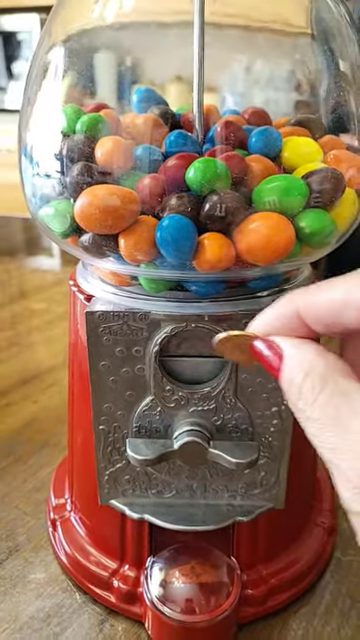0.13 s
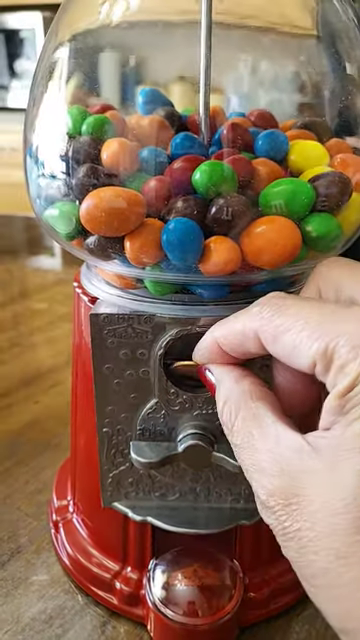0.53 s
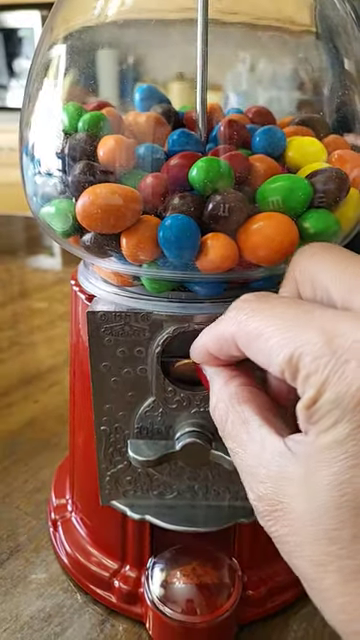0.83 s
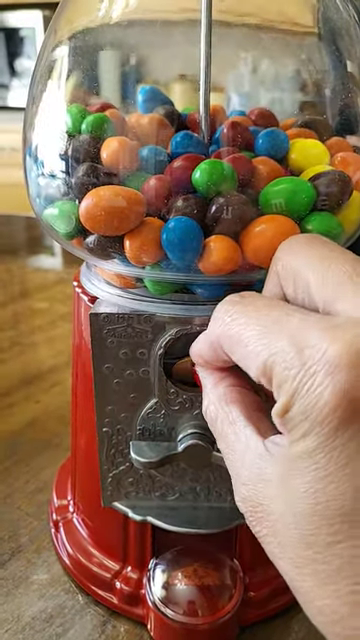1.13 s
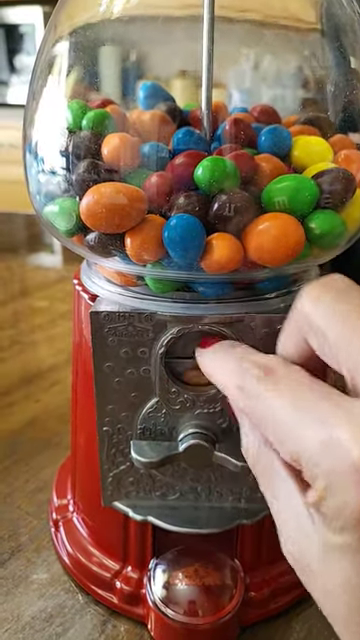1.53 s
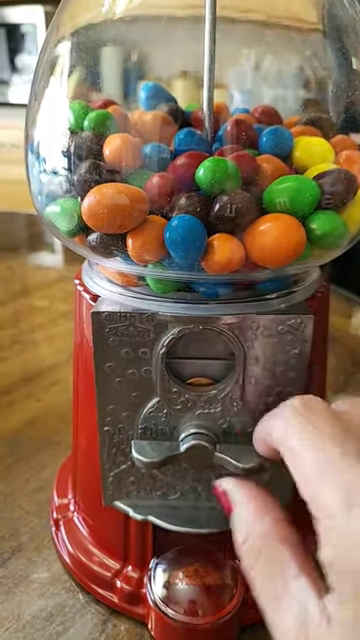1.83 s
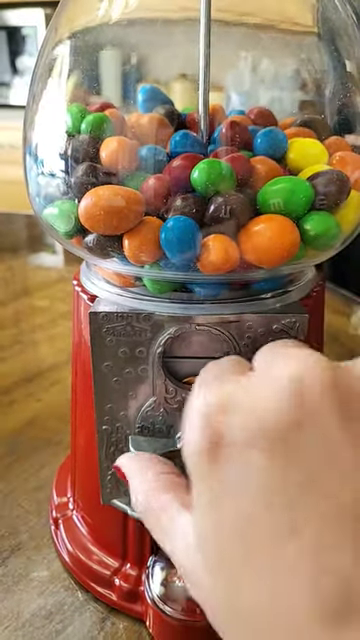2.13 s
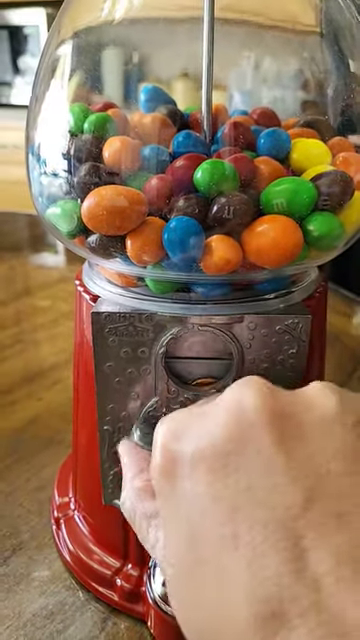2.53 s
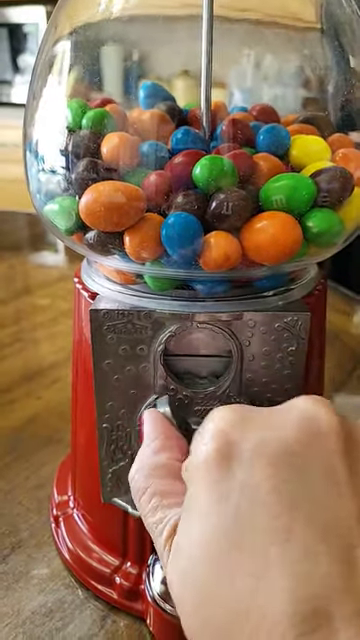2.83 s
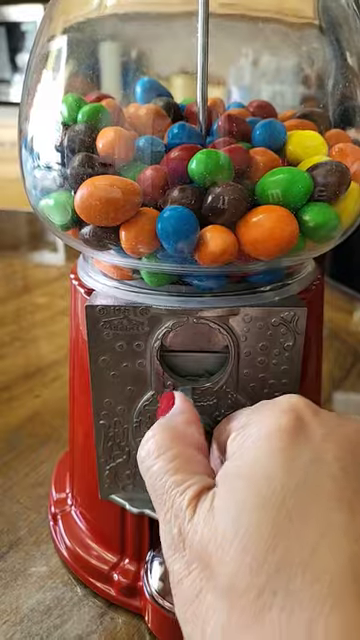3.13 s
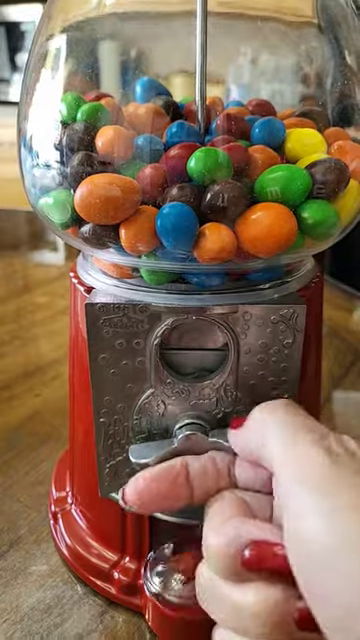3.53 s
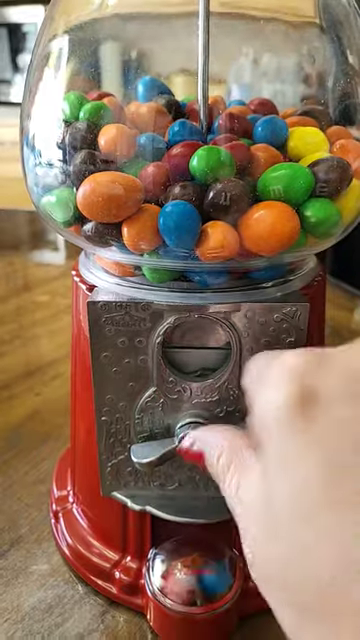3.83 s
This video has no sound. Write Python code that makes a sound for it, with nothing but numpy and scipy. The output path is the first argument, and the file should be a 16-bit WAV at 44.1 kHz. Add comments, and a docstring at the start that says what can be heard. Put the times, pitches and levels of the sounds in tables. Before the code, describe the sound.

A small metal candy dispenser heard close up in a quiet room: a coin ticks at the slot and drops behind the plate, the crank knocks and clanks, then hard candies clatter down the chute.

```python
"""A faint hum, low air noise, brushing fingers and a soft knock come first: a small metal candy dispenser, close by.
A coin ticks and slides at the slot, then drops and bounces behind the face plate: noise bursts plus damped modes.
The crank is turned: friction noise rubs and judders, the works clank, and the hollow housing thumps in low modes.
Hard candies clatter down the chute: dense bursts over chute modes, with the steel flap ringing high above them."""
import sys
import numpy as np
from scipy import signal
from scipy.fft import rfft, irfft, next_fast_len
from scipy.io import wavfile

SR = 44100
rng = np.random.default_rng(int(sys.argv[2]) if len(sys.argv) > 2 else 0)


def file_out(sig):
    """Save sig as 16-bit WAV at sys.argv[1]."""
    # one column per channel
    cols = np.atleast_2d(sig).T
    # limit, then scale
    lim = np.clip(cols, -1, 1)
    pcm = np.round(lim * 32767).astype(np.int16)
    wavfile.write(sys.argv[1], SR, pcm)


N = 176400  # samples in the scene
RING_N = 24000  # samples in one contact
TOP_HZ = 15700  # band limit
# spacing and depth of the random peaks: broad ones drawn for each contact, dense ones drawn for each body
PATCH_HZ, PATCH_DB = 330, 3.2
MODE_HZ, MODE_DB = 35, 3
GRAZE_S = .004  # parts graze for this long before they strike

# normal modes of the coin: (frequency [Hz], relative level [dB])
COIN_MODES = [(2490, 8), (3450, 3.5), (4160, 6)]


def amp(db):
    """Level to amplitude ratio: 20 dB is a factor of ten."""
    return 10 ** (np.asarray(db) / 20)


def unit(x):
    """Normalisation to unit mean power."""
    return x / np.sqrt(np.mean(x ** 2) + 1e-20)


def along(points, hz):
    """Linear interpolation of (frequency [Hz], value) points on a logarithmic frequency axis."""
    f, v = np.transpose(points)
    return np.interp(np.log(hz + 1), np.log(f + 1), v)


def fade(t, t60):
    """Exponential decay: the amplitude falls by 60 dB in t60 seconds."""
    return np.exp(-np.log(1000) * t / max(t60, 1e-3))


def add(out, s, x):
    """Superposition: mix x into out from time s [s]."""
    part = out[:, max(round(s * SR), 0):][:, :x.shape[1]]
    part += x[:, :part.shape[1]]


def coloured(x, tone, shades=()):
    """Minimum-phase filtering: two unrelated signals become a stereo pair of given colour and coherence."""
    # left-right likeness: (frequency [Hz], correlation [-1 to 1])
    likeness = [(40, 0.21), (280, 0.99), (600, 0.24), (2500, -0.058), (12000, -0.1)]
    size = 2 * next_fast_len(x.shape[1] // 2 + 2048)
    hz = np.fft.rfftfreq(size, 1 / SR)
    low_cut = np.sqrt(1 + (tone[0][0] / 2 / (hz + 1)) ** 4)
    gain = unit(amp(along(tone, hz)) / low_cut)
    # shades act after the colour has been brought to unit power
    gain = gain * amp(sum(along(shade, hz) for shade in shades))
    # folding the cepstrum onto positive times makes the filter causal
    cepstrum = irfft(np.log(gain + 1e-6))
    cepstrum[1:size // 2] *= 2
    cepstrum[size // 2 + 1:] = 0
    response = np.exp(rfft(cepstrum))
    alike = np.clip(along(likeness, hz), -1, 1)
    shares = np.sqrt([(1 + alike) / 2, (1 - alike) / 2])
    mid, side = irfft(rfft(x, size) * response * shares)[:, :x.shape[1]]
    return np.array([mid + side, mid - side])


def ripple(spacing_hz, depth_db):
    """Modal irregularity: random peaks and valleys, weak in the bass, of unit power; (Hz, dB) points."""
    hz = np.arange(0, SR / 2, spacing_hz)
    db = depth_db * np.clip(rng.standard_normal(len(hz)), -2, 2) * hz / (hz + 2 * PATCH_HZ)
    return np.c_[hz, 20 * np.log10(unit(amp(db)))]


def hardness(treble_db, clunk_db=0):
    """Contact stiffness: how one blow departs from the usual colour; (Hz, dB) points."""
    return [(540, 0), (760, clunk_db), (1500, 0), (6500, 0), (11000, treble_db)]


def ring(modes, t60, attack_s, channels=2, scatter_db=1.0):
    """Modal vibration: damped sines start after the graze, with level and phase varied at each blow."""
    t = np.maximum(np.arange(RING_N) / SR - GRAZE_S, 0)
    out = 0
    for hz, db in modes:
        gain = amp(db + scatter_db * rng.standard_normal((channels, 1)))
        phase = rng.uniform(0, 2 * np.pi, (channels, 1))
        out = out + gain * np.sin(2 * np.pi * hz * t + phase)
    return out * fade(t, t60) * (1 - np.exp(-t / attack_s))


def clack(tone, body, shade, hold_s, t60, tail_db, tail_t60, attack_s):
    """Impact: a brief graze, a dense noise burst, then a weak tail of housing and room whose treble dies first."""
    graze_db = -21  # against the blow
    damp_hz, treble_life = 8500, .75  # above damp_hz the tail has this share of its decay time
    t = np.arange(RING_N) / SR - GRAZE_S
    after = np.maximum(t, 0)
    rise = 1 - np.exp(-after / attack_s)
    graze = amp(graze_db) * np.maximum(1 - np.abs(t) / GRAZE_S, 0)
    near, far = rng.standard_normal((2, 2, RING_N))
    burst = near * (graze + rise * fade(np.maximum(after - hold_s, 0), t60))
    dull = signal.filtfilt(*signal.butter(2, damp_hz, fs=SR), far)
    bright = far - dull
    tail = dull * fade(after, tail_t60) + bright * fade(after, tail_t60 * treble_life)
    patch = ripple(PATCH_HZ, PATCH_DB)
    return coloured(burst + amp(tail_db) * rise * tail, tone, [body, shade, patch])


def thump():
    """Structural resonance: the hollow housing answers a blow in its low modes."""
    # normal modes of the housing: (frequency [Hz], relative level [dB])
    housing_modes = [(65, -10.5), (194, -2), (222, -1), (250, -3), (290, 5.5), (325, 1)]
    return amp(-6.5) * ring(housing_modes, t60=.15, attack_s=0.00061, channels=1, scatter_db=6.0)


def strokes(rows, tone, rise, grain_db, grain_rate):
    """Sliding friction: each noise stroke swells, dies away and catches unevenly, grain_rate times a second."""
    out = np.zeros((2, N))
    for s, length, db in rows:
        size = int(length * SR)
        u = np.arange(size) / size
        grain = np.interp(np.arange(size) * grain_rate / SR, np.arange(N), rng.standard_normal(N))
        hiss = rng.standard_normal((2, size)) * unit(amp(grain_db * grain))
        # rise is the share of the stroke spent swelling
        shape = np.interp(u, [0, np.clip(rise, .01, .9), 1], [0, 1, 0])
        padded = np.pad(hiss * shape, ((0, 0), (0, 2048)))  # room for the filter to ring on
        add(out, s, amp(db) * coloured(padded, tone))
    return out


def sing(rows, q):
    """Driven resonance: friction noise passes one resonance of sharpness q, swells and dies away."""
    out, f = np.zeros((2, N)), np.arange(20, TOP_HZ, 10)
    for s, length, db, hz in rows:
        peak = np.c_[f, -20 * np.log10(1 + (q * (f / hz - hz / f)) ** 2)]
        out += strokes([(s, length, db)], peak, rise=0.11, grain_db=0, grain_rate=0)
    return out


def room():
    """Stationary background: low air noise of fixed spectrum and an appliance's hum of steady sines."""
    # hum partials: (frequency [Hz], level [dB])
    hum_partials = [(60, -68), (308, -66), (438, -64.5)]
    # air noise spectrum: (frequency [Hz], relative level per hertz [dB])
    air_tone = [(25, -29), (55, -14), (300, -13), (450, -14), (800, -27.5), (1500, -36.5), (4000, -42),
                (6300, -33.5), (15000, -46)]
    t = np.arange(N) / SR
    hum = sum(amp(db) * np.sin(2 * np.pi * (hz * t + rng.random())) for hz, db in hum_partials)
    return hum + amp(-65.5) * coloured(rng.standard_normal((2, N)), air_tone)


def coin_in_slot():
    """Impact and friction of a held coin: it ticks and slides at the slot, its modes ringing faintly after each
    tick."""
    # coin touching the slot: (time [s], relative level [dB], treble [dB])
    ticks = [(0.694, -31.5, -7), (0.829, -46.5, -35), (0.926, -43.5, -1), (1.016, -61, 15),
             (1.388, -51.5, -2.5), (1.43, -39, 3), (1.612, -36.5, 15)]
    # coin sliding on the slot's edge: (start [s], length [s], level [dB])
    slides = [(.72, 0.138, -56), (1.365, 0.084, -52)]
    # coin ringing faintly as its rim drags: (start [s], length [s], level [dB], resonance [Hz])
    rim_rings = [(.53, 0.15, -64, 1960), (1.035, 0.14, -71.5, 2410), (1.44, 0.23, -71.5, 2560)]
    # fingers brushing the plate: (start [s], length [s], level [dB])
    brushes = [(0, 0.12, -63.5), (.53, 0.14, -68.5), (.586, 0.13, -47.5)]
    # spectra of coin and fingers: (frequency [Hz], relative level per hertz [dB])
    coin_tone = [(700, -31.5), (2000, -16.5), (3400, -8.5), (5100, -5), (6000, -16), (7500, -11.5),
                 (9000, -29.5), (15500, -42)]
    brush_tone = [(240, -11), (400, -6), (480, -8.5), (4670, -9.5), (15000, -23.5)]
    out = strokes(slides, coin_tone, rise=0.86, grain_db=1.0, grain_rate=900)
    out += strokes(brushes, brush_tone, rise=0.094, grain_db=2.5, grain_rate=1600)
    out += sing(rim_rings, q=6)
    body = ripple(MODE_HZ, MODE_DB)
    for s, db, treble_db in ticks:
        burst = clack(coin_tone, body, hardness(treble_db), hold_s=0.0008, t60=0.024,
                      tail_db=-27.5, tail_t60=0.67, attack_s=0.00047)
        held_ring = ring(COIN_MODES, t60=0.23, attack_s=.0005)
        add(out, s - GRAZE_S, amp(db) * (amp(7.5) * burst + amp(-29) * held_ring))
    return out


def coin_drop():
    """Repeated impact: let go, the coin bounces to rest behind the face plate and excites the housing."""
    # coin dropping and bouncing in its pocket: (time [s], relative level [dB], treble [dB])
    bounces = [(1.637, -17.5, 1), (1.676, -28.5, -8), (1.699, -22, 3.5), (1.73, -26, 0.5), (1.749, -27, -8),
               (1.759, -34, 1), (1.765, -33, -12), (1.895, -38.5, -60)]
    # spectrum of the bounces: (frequency [Hz], relative level per hertz [dB])
    drop_tone = [(260, -30), (530, -13.5), (700, 3.5), (1100, -9), (2200, -2.5), (3300, -2), (6280, 2.5),
                 (15500, -10)]
    out, body = np.zeros((2, N)), ripple(MODE_HZ, MODE_DB)
    for s, db, treble_db in bounces:
        burst = clack(drop_tone, body, hardness(treble_db), hold_s=0.0017, t60=0.021,
                      tail_db=-17, tail_t60=0.34, attack_s=0.00079)
        free_ring = ring(COIN_MODES, t60=0.13, attack_s=0.00057)
        add(out, s - GRAZE_S, amp(db) * (amp(2.5) * burst + amp(-28) * free_ring + amp(-20) * thump()))
    return out


def crank():
    """Friction and impact in a mechanism: the wheel rubs and judders; pawl and gears knock on the cast housing."""
    # knocks of crank, pawl and wheel, the first (0.086 s) a soft tap of finger or coin on the plate: (time [s],
    # level [dB], treble [dB], clunk [dB], relative level of the housing's thump [dB])
    knocks = [(0.086, -51.5, -10, 10, -62), (2.208, -44.5, -43, 3, -63), (2.525, -58.5, -20, 20, -81.5),
              (2.57, -47, -25, 12, -59.5), (2.615, -48, -37, 18, -50.5), (2.69, -23.5, -6, 1, -39),
              (2.694, -16.5, 4.5, -7.5, -37.5), (2.799, -30.5, 12.5, 6.5, -45), (3.027, -43.5, 3, 2, -35),
              (3.056, -41, -3, 16.5, -64), (3.334, -13, 4.5, -11, -23), (3.346, -16, 12, -7.5, -40),
              (3.361, -20, 16, -15, -56), (3.419, -31, 20, 3, -41.5), (3.431, -18, 14.5, -7.5, -41),
              (3.499, -18.5, 11, -3, -28), (3.525, -10, 10.5, -24.5, -35), (3.545, -23, 17, 21, -28),
              (3.553, -11, 14, -27, -33), (3.58, -24, 1, -6, -55), (3.61, -24.5, 2, -31, -34.5)]
    # wheel rubbing as it turns: (start [s], length [s], level [dB])
    rubs = [(1.89, 0.22, -62), (2.59, 0.29, -59), (2.93, 0.3, -59), (3.532, 0.089, -19)]
    # housing juddering under the crank's load: (start [s], length [s], level [dB], resonance [Hz])
    judders = [(2.78, 0.016, -39.5, 274), (2.96, 0.14, -54.5, 239), (3.054, 0.07, -34.5, 290),
               (3.335, 0.025, -21, 231), (3.37, 0.17, -40, 212.5), (3.542, 0.031, -25, 263),
               (3.63, 0.43, -39, 254)]
    # dull shoves against the table: (start [s], length [s], level [dB])
    shoves = [(3.335, 0.15, -51), (3.5, 0.18, -34), (3.745, 0.045, -40)]
    # spectra of works and shoves: (frequency [Hz], relative level per hertz [dB])
    works_tone = [(450, -9.5), (760, 1), (1250, -1), (1800, -1), (2080, 8), (2450, -0.5), (4000, 0.5),
                  (7000, 0.5), (8500, -10.5), (15500, -23)]
    shove_tone = [(25, -12.5), (55, -2), (130, -12.5), (800, -49)]
    # normal modes of the works: (frequency [Hz], relative level [dB])
    works_modes = [(690, 0.67), (2016, 2), (2060, 0.67), (2198, 0.93), (2805, 3.5)]
    out = strokes(rubs, works_tone, rise=0.065, grain_db=3.0, grain_rate=260)
    out += sing(judders, q=3.5)
    out += strokes(shoves, shove_tone, rise=0.18, grain_db=6, grain_rate=61)
    body = ripple(MODE_HZ, MODE_DB)
    for s, db, treble_db, clunk_db, thump_db in knocks:
        burst = clack(works_tone, body, hardness(treble_db, clunk_db), hold_s=0.0032, t60=0.017,
                      tail_db=-13.0, tail_t60=0.35, attack_s=0.00045)
        metal = amp(-20) * ring(works_modes, t60=0.09, attack_s=0.00063)
        add(out, s - GRAZE_S, amp(db) * (burst + metal) + amp(thump_db) * thump())
    return out


def candies():
    """Impact excitation: sugar shells clatter down the chute; the hardest hits ring the steel flap's high modes."""
    # candies striking chute and flap: (time [s], relative level [dB], treble [dB])
    strikes = [(3.628, -6, -11.5), (3.648, -10, 1), (3.673, -10.5, -2), (3.703, -16, -15),
               (3.711, -9.5, -4), (3.727, -8, -9), (3.74, -21.5, 3), (3.751, -11.5, 2), (3.772, -11, 0),
               (3.799, -16, -2), (3.813, -15, -9.5), (3.844, -20.5, -3.5), (3.869, -17.5, -14),
               (3.895, -22.5, -5), (3.906, -24.5, -11), (3.912, -17.5, -13), (3.93, -23.5, -3),
               (3.943, -19.5, -12), (3.954, -25.5, -9), (3.97, -22.5, -26), (3.98, -27, -9)]
    # spectrum of the strikes: (frequency [Hz], relative level per hertz [dB])
    candy_tone = [(240, -21), (400, -20.5), (834, -17.5), (1050, -11.5), (1820, -15.5), (2090, -5.5),
                  (4840, -5), (13100, -6), (15500, -15)]
    # normal modes of chute and flap: (frequency [Hz], relative level [dB])
    chute_modes = [(1077, -12), (2018, -4.5), (2518, -2), (3845, -5.5), (4452, -16), (4878, -0.5)]
    flap_modes = [(9380, -15), (12910, -3.5), (13260, -3)]
    # the flap's ring, a row each for the left and right microphone: (relative level [dB])
    flap_db = np.array([[-4], [-11]])
    out, body = np.zeros((2, N)), ripple(MODE_HZ, MODE_DB)
    for s, db, treble_db in strikes:
        burst = clack(candy_tone, body, hardness(treble_db), hold_s=0.0026, t60=0.027,
                      tail_db=-10.5, tail_t60=.33, attack_s=0.00023)
        chute = amp(-11.5) * ring(chute_modes, t60=0.062, attack_s=0.0002)
        flap = amp(treble_db + flap_db) * ring(flap_modes, t60=.04, attack_s=0.00068)
        add(out, s - GRAZE_S, amp(db) * (amp(-1.5) * burst + chute + flap))
    return out


def scene():
    """Superposition of coin, crank and candies over the quiet room."""
    return room() + coin_in_slot() + coin_drop() + crank() + candies()


def record(dry):
    """Transduction: two microphones differ in colour, round off the highest peaks and are band-limited."""
    # left over right: (frequency [Hz], level difference [dB])
    balance = [(40, -3.5), (300, -4), (480, -8.5), (1000, -3), (8000, 0.5), (13000, 0)]
    size = next_fast_len(N + SR // 2)
    hz = np.fft.rfftfreq(size, 1 / SR)
    x = irfft(rfft(dry, size) * amp(np.outer([.5, -.5], along(balance, hz))), size)
    x = x / (1 + (np.abs(x) / .9) ** 8) ** (1 / 8)  # soft saturation towards 0.9
    cut = 1 / np.sqrt(1 + (hz / TOP_HZ) ** 160)
    return irfft(rfft(x) * cut, size)[:, :N]


dry = scene()
out = record(dry)
file_out(out)
```